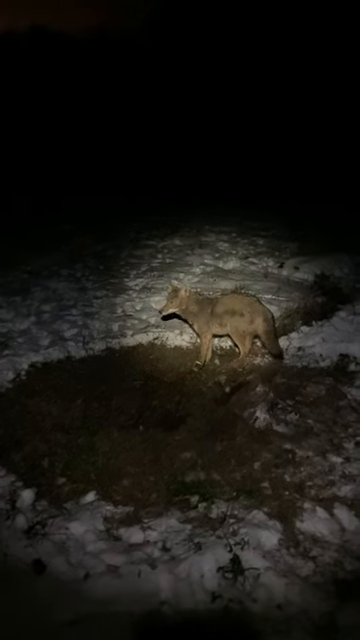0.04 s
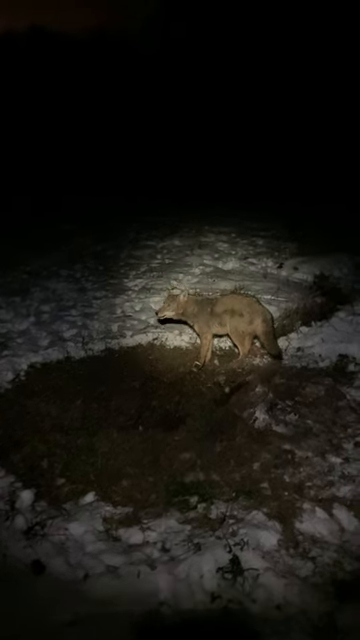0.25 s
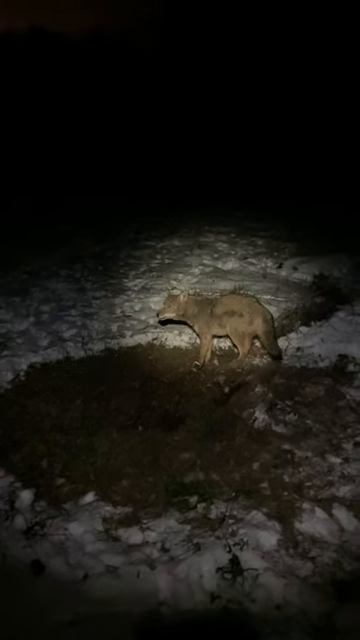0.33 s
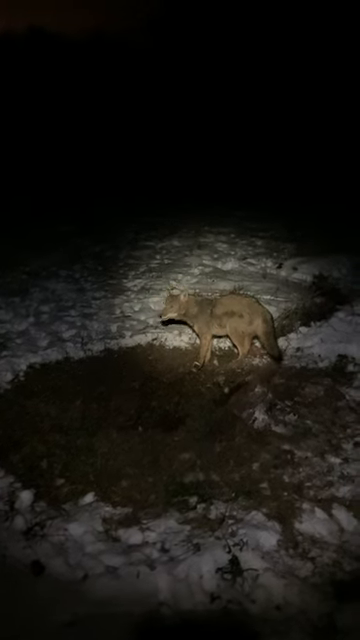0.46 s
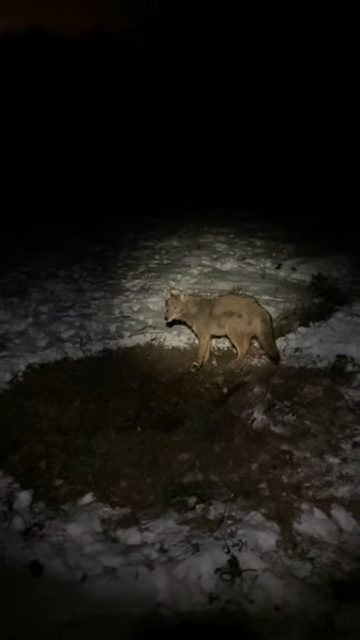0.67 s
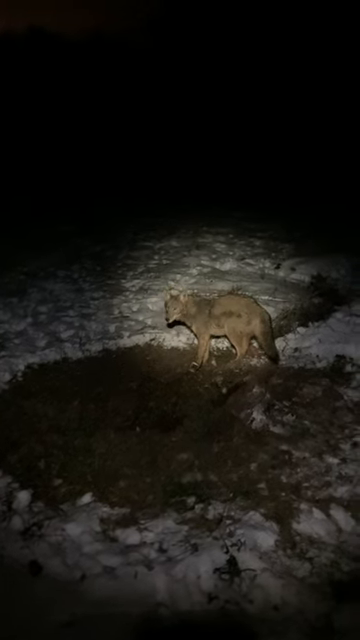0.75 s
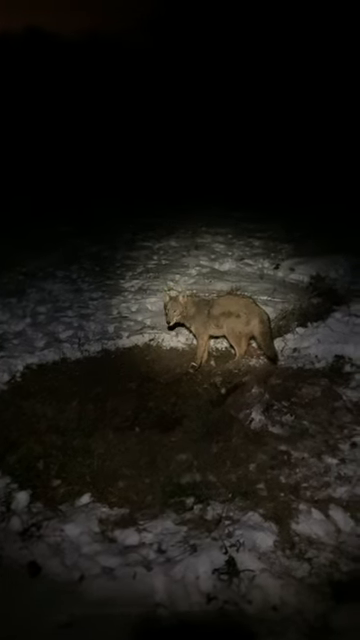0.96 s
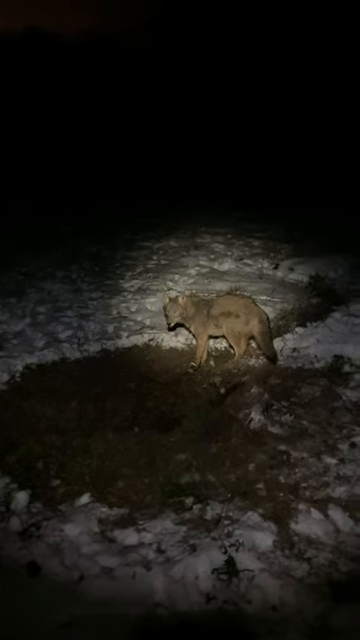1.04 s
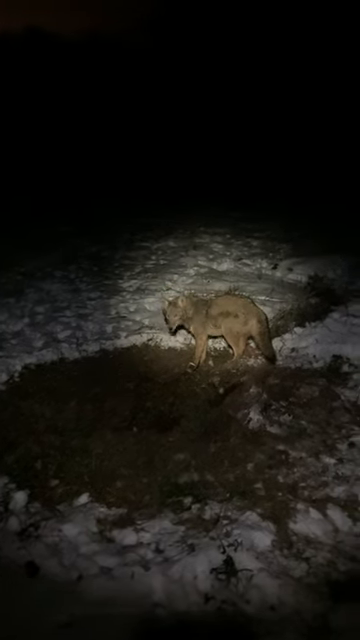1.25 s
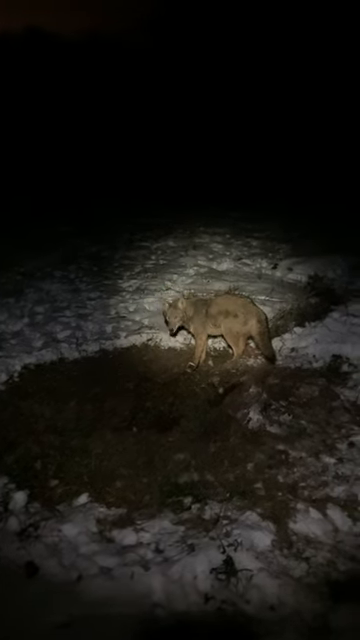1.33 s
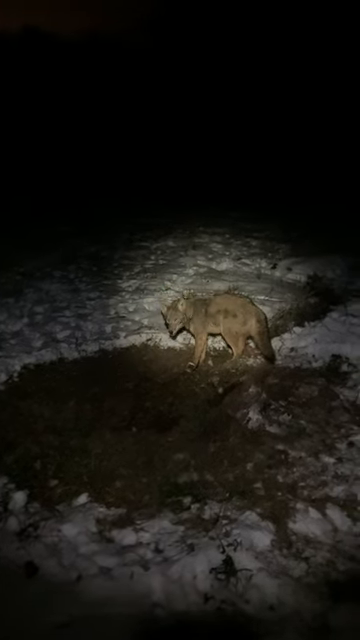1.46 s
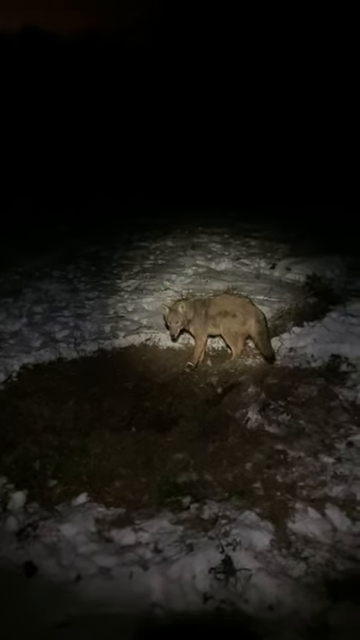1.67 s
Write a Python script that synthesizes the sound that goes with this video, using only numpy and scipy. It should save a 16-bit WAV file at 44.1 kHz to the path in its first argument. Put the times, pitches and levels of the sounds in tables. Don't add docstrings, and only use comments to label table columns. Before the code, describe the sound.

Two loud, raspy coyote yips about a second apart, each launched from a brief growl; a faint sinking whine and hum link them. Open night field, dull distant echo, soft hush and low wind at the microphones.

```python
import sys
import numpy as np
from scipy import signal
from scipy.fft import rfft, irfft, next_fast_len
from scipy.io import wavfile

SR = 44100
rng = np.random.default_rng(int(sys.argv[2]) if len(sys.argv) > 2 else 0)


def ratio(d):
    e = np.asarray(d, float) / 20
    return 10 ** e


def master(y):
    cut = np.clip(np.atleast_2d(y).T, -1, 1)
    pcm = np.round(cut * 32767)
    wavfile.write(sys.argv[1], SR, pcm.astype(np.int16))


N = 74970


def rms_one(x):
    return x / np.sqrt(np.mean(x ** 2) + 1e-20)


def at_hz(points, hz):
    point_hz, value = np.transpose(points)
    return np.interp(np.log(hz + 1), np.log(point_hz), value)


def drift(rate_hz):
    r = np.exp(-2 * np.pi * rate_hz / SR)
    settle = 9000
    wander = signal.lfilter([1], [1, -2 * r, r * r], rng.standard_normal(N + settle))
    return rms_one(wander[settle:])


def band(x, low_hz, high_hz):
    return signal.sosfilt(signal.butter(2, [low_hz, high_hz], "band", fs=SR, output="sos"), x)


def shaped(x, gain):
    size = next_fast_len(N + 4096)
    return irfft(rfft(x, size) * gain(np.fft.rfftfreq(size, 1 / SR)), size)[..., :N]


def peaks(rows, hz):
    power = 0
    for mid_hz, width_hz, level_db in rows:
        power = power + ratio(2 * level_db) / (1 + (2 * (hz - mid_hz) / width_hz) ** 2) ** 2.2
    return np.sqrt(power)


# pitch_hz, level_db (per Hz)
HUSH_COLOUR = [(40, -15), (70, -5), (150, -22), (480, -6), (1000, -15), (2000, -37), (5000, -35.5),
               (15000, -44)]


def night():
    hush = shaped(rng.standard_normal(N), lambda hz: ratio(at_hz(HUSH_COLOUR, hz)))
    return ratio(-66 + 1.1 * drift(6)) * rms_one(hush)


# time_s, level_db, half_length_s, top_hz
AIR_PUSHES = [
    (1.5255, -52, 0.053, 77),
    (1.5, -38, 0.0088, 210),
    (1.1, -48, 0.02, 240),
    (.22, -48, .03, 100),
]


def wind():
    t, white = np.arange(N) / SR, rng.standard_normal((2, N))
    wind_db, gusts_db = -74.5, 6
    out = ratio(wind_db + gusts_db * drift(8.7)) * rms_one(band(white, 30, 85))
    for time_s, level_db, half_length_s, top_hz in AIR_PUSHES:
        swell = np.exp(-((t - time_s) / half_length_s) ** 2)
        out = out + ratio(level_db) * swell * rms_one(band(white, 41, top_hz))
    return out


SHIMMER_DB = 5.5


def low_partials(phase, first_db, second_db, rough):
    fundamental = ratio(first_db) * np.sin(phase)
    octave = ratio(second_db + SHIMMER_DB * rough * drift(60)) * np.sin(2 * phase)
    return fundamental + octave


# mid_hz, width_hz, level_db
MOUTH = [(870, 300, 10.5), (1160, 300, -15), (1574, 260, 1), (1894, 170, -3.5), (2845, 130, -16),
         (3190, 300, -39.5)]


def upper_partials(phase, pitch_hz, upper_db, rough):
    t = np.arange(N) / SR
    coarse = slice(None, None, 32)
    jaw_shut_db, jaw_range_db, jaw_loss_db = -64, 22.5, -25.5
    shut = np.clip(1.5 - (upper_db - jaw_shut_db) / jaw_range_db, 0, 1)[coarse]
    mid_hz, width_hz, level_db = MOUTH[0]
    mouth = [(mid_hz, width_hz, level_db + jaw_loss_db * shut)] + list(MOUTH[1:])
    partials, power, flicker = 0, 1e-9, drift(25)
    for k in range(3, 14):
        hz = k * pitch_hz[coarse]
        gain = peaks(mouth, hz)
        power = power + gain ** 2 * np.exp(-((hz - 1800) / 600) ** 4)
        flicker_db = 3.5 * np.roll(flicker, 6007 * k)[coarse]
        gain = gain * ratio(flicker_db)
        partials = partials + np.interp(t, t[coarse], gain) * np.sin(k * phase - k * k / 5)
    levelled = partials / np.interp(t, t[coarse], np.sqrt(power))
    half_lines = 0.49
    return levelled * (1 + half_lines * 2 * rough * np.sin(phase / 2))


# mid_hz, width_hz, level_db
THROAT_TONES = [(520, 140, -3), (740, 170, -4), (1085, 93, 3.5), (1565, 290, -2.5), (1936, 130, 0),
                (2244, 94, -9.5), (2854, 150, -9), (3380, 130, -19), (3930, 120, -26), (5160, 1500, -35)]


def throat_rasp(phase):
    gate_depth = 1
    gated = rng.standard_normal(N) * (1 + gate_depth * np.sin(phase))
    rasp = shaped(gated, lambda hz: peaks(THROAT_TONES, hz))
    return rasp / np.std(band(rasp, 1300, 2400))


# mid_hz, width_hz, level_db
TEETH_TONES = [(6695, 1100, 1.5), (8820, 1200, -2.5), (10330, 1200, -9), (13800, 2000, -18),
               (15200, 800, -20.5)]
# mid_hz, width_hz, level_db
NOSE_TONES = [(2700, 230, -0.5), (5800, 150, 5), (6630, 230, -3.5), (8400, 500, -6)]


def rushing_air(upper_db, rough):
    t, white = np.arange(N) / SR, rng.standard_normal((2, N))
    push_db = np.minimum(upper_db + 20, 0) + 10 * np.log10(np.clip(3 * rough, 1e-3, 1))
    fall_db = 264 * t
    late_db = np.maximum.accumulate(push_db + fall_db) - fall_db
    teeth_db = -37.5 + 1.546 * late_db
    teeth = ratio(teeth_db) * rms_one(shaped(white[0], lambda hz: peaks(TEETH_TONES, hz)))
    nose_db = -86.5 + 4.0 * drift(4)
    nose = ratio(nose_db) * rms_one(shaped(white[1], lambda hz: peaks(NOSE_TONES, hz)))
    return teeth + nose


# time_s, pitch_hz, fundamental_db, octave_db, upper_db, roughness (0-1)
FIRST_BARK = [
    (0.181, 123.5, -63, -70, -84, 0.3),
    (0.204, 198.7, -32, -40.5, -45, 0.42),
    (0.209, 444.3, -25.5, -27.5, -24.5, 0.32),
    (0.234, 493, -9.5, -26.5, -12.5, 0.44),
    (0.25, 523.5, -12.5, -23.5, -18.5, 0.55),
    (0.27, 576, -20.5, -12, -23, 0.3),
    (0.29, 511, -22, -27.5, -31, 0.3),
    (0.319, 467, -33, -33.5, -44.5, 0.13),
    (0.349, 447.4, -41, -40, -61.5, 0.02),
]
WHINE_TO_HUM = [
    (0.386, 397.2, -51, -44, -49.5, 0.01),
    (0.47, 378, -56, -44.5, -55, 0.01),
    (0.659, 351.7, -61, -45, -60, 0.02),
    (0.7, 347.2, -59.5, -58.5, -66, 0.05),
    (0.759, 332.1, -51.5, -62, -66.5, 0.05),
    (0.92, 302.7, -49, -64.5, -69, 0.05),
    (1.01, 242.5, -42.5, -72, -81.5, 0.1),
    (1.1, 233.8, -43.5, -68, -88.5, 0.11),
    (1.367, 229.7, -42.5, -70.5, -89, 0.1),
]
SECOND_BARK = [
    (1.382, 95.05, -50.5, -46, -100, 0.3),
    (1.415, 135.4, -34.5, -40, -66, 0.34),
    (1.432, 197.1, -31.5, -41.5, -39, 0.3),
    (1.457, 219.8, -32, -34, -37.5, 0.3),
    (1.461, 470.8, -26, -22.5, -27, 0.35),
    (1.482, 485.6, -9.5, -23, -17.5, 0.45),
    (1.499, 486.1, -27, -28.5, -21, 0.85),
    (1.525, 479.6, -23, -28, -33, 0.5),
    (1.54, 424, -24.5, -46, -36.5, 0.06),
]
LAST_WHIMPER = [
    (1.56, 408, -35, -42, -47.5, 0.02),
    (1.59, 383, -48, -44, -44.5, 0.01),
    (1.635, 358, -63.5, -52.5, -59.5, 0.02),
    (1.66, 328, -54, -56.5, -59, 0.02),
    (1.69, 320, -54.5, -57, -63, 0.02),
]


def coyote():
    t = np.arange(N) / SR
    time_s, *columns = np.transpose([*FIRST_BARK, *WHINE_TO_HUM, *SECOND_BARK, *LAST_WHIMPER])
    pitch_hz, first_db, second_db, upper_db, rough = [np.interp(t, time_s, c) for c in columns]
    rough = np.clip(rough, 0, 1)
    jitter, wobble = 0.044, 0.006
    unsteady = 1 + jitter * rough * drift(90) + wobble * drift(14)
    phase = 2 * np.pi * np.cumsum(pitch_hz * unsteady) / SR

    low = low_partials(phase, first_db, second_db, rough)
    clean = upper_partials(phase, pitch_hz, upper_db, rough)
    clean = np.sqrt(2 - 2 * rough) * clean * ratio(SHIMMER_DB * rough * drift(60))
    rasp_db, breath_db = 1, -30.5
    upper = clean + throat_rasp(phase) * (ratio(rasp_db) * rough + ratio(breath_db))

    onset = np.clip((t - time_s[0]) / 0.0046, 0, 1)
    return (np.sqrt(2) * low + ratio(upper_db) * upper) * onset + rushing_air(upper_db, rough)


def field(x):
    t, noise = np.arange(N) / SR, rng.standard_normal((2, N))
    near_db, near_t60_s = -23, 0.12
    near = ratio(near_db - 60 * t / near_t60_s) * noise[0] * (t > .004)
    near = near / np.sqrt(near_t60_s * SR / 14)
    far_db, far_t60_s, far_delay_s, far_rise_s = -39.5, 2.8, .14, .15
    rise = np.clip((t - far_delay_s) / far_rise_s, 0, 1)
    far = ratio(far_db - 60 * t / far_t60_s) * rise * band(noise[1], 430, 1100) / np.sqrt(SR / 20)
    return signal.fftconvolve(x, near + far)[:N]


# pitch_hz, phase_rad
PHASE_LAG = [(60, 0.39), (430, 1.5), (900, 3), (1550, 4), (2800, 4), (5500, 3.5), (11500, -3.5),
             (14300, -5)]
# pitch_hz, level_db
LEVEL_SKEW = [(60, -0.5), (170, -3), (330, 4), (520, 4.5), (700, -1), (2000, -0.5), (2900, 2), (4500, 0)]


def widen(air):
    def half_skew(hz):
        level = ratio(at_hz(LEVEL_SKEW, hz) / 2)
        return level * np.exp(1j * np.interp(hz, *np.transpose(PHASE_LAG)) / 2)

    left = shaped(air, lambda hz: 1 / half_skew(hz))
    right = shaped(air, half_skew)
    return np.array([left, right])


def scene():
    voice = coyote()
    air = night() + voice + field(voice)
    scatter = ratio(-8) * (field(voice) + night())
    return widen(air) + scatter + wind()


def low_pass(x):
    return signal.sosfilt(signal.butter(12, 15710, fs=SR, output="sos"), x)


def record(dry):
    rounded = 1.314 * np.tanh(dry / 1.339)
    top_cut = signal.cheby2(12, 70, 16400, fs=SR, output="sos")
    return low_pass(signal.sosfilt(top_cut, rounded))


dry = scene()
out = record(dry)
master(out)
```